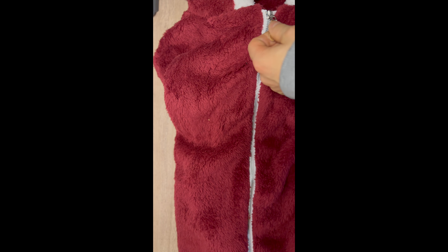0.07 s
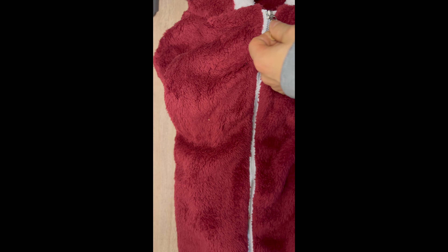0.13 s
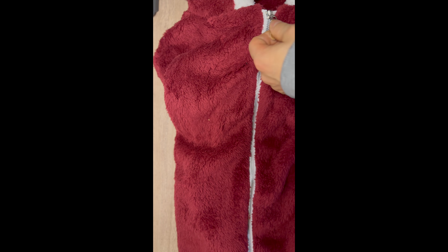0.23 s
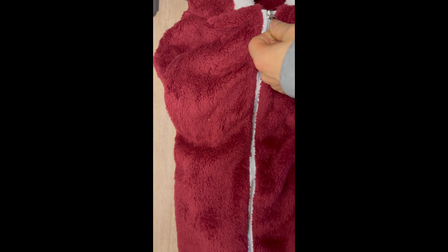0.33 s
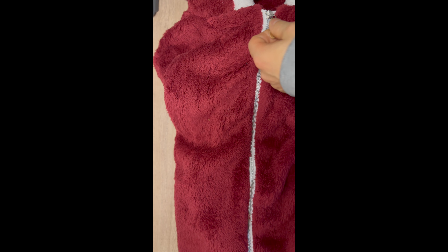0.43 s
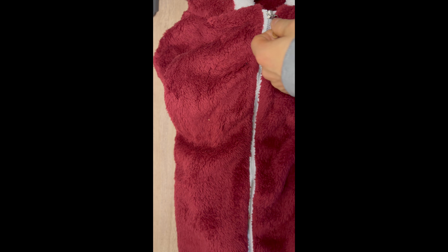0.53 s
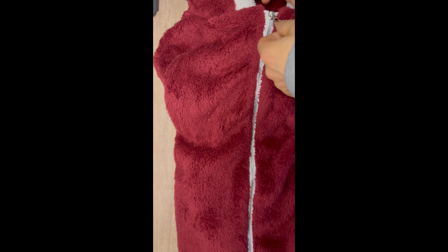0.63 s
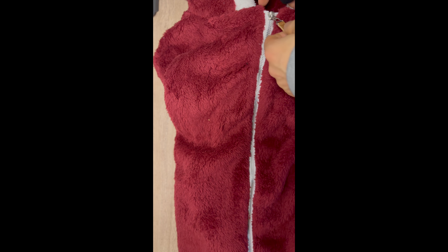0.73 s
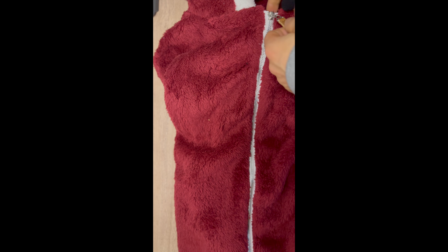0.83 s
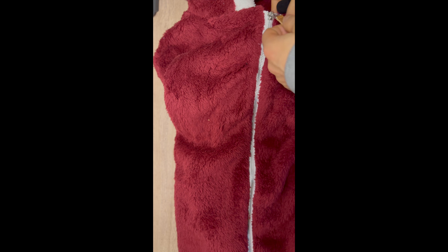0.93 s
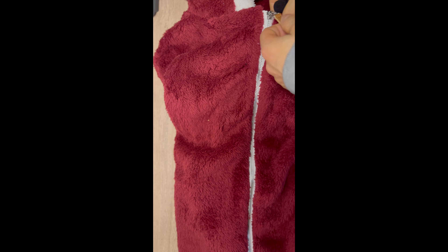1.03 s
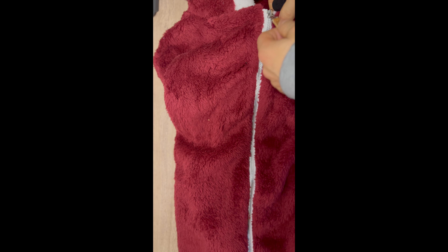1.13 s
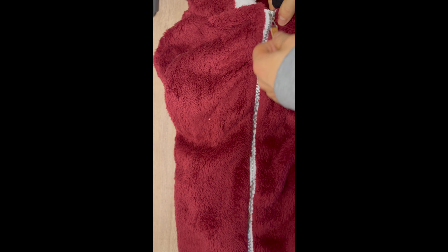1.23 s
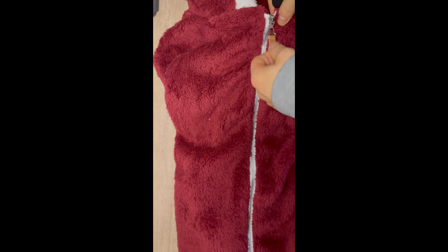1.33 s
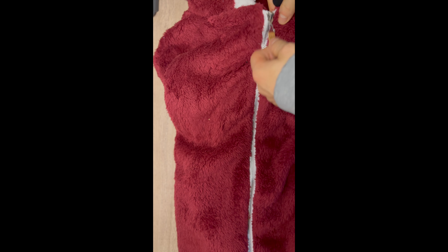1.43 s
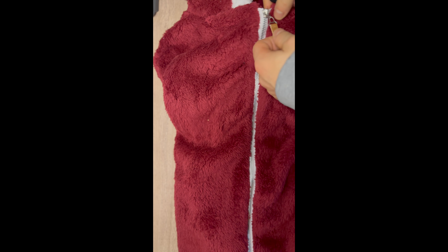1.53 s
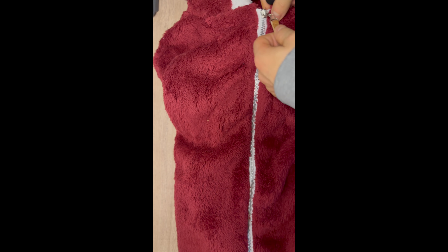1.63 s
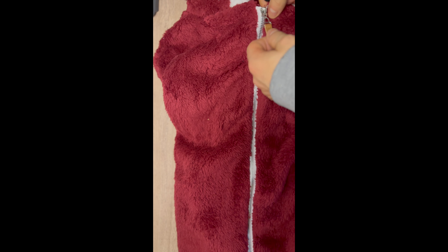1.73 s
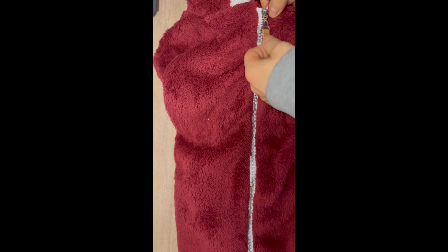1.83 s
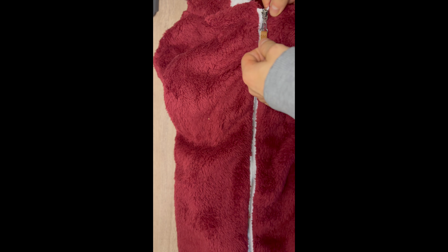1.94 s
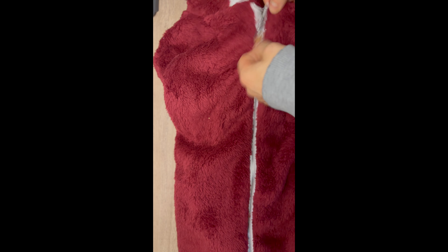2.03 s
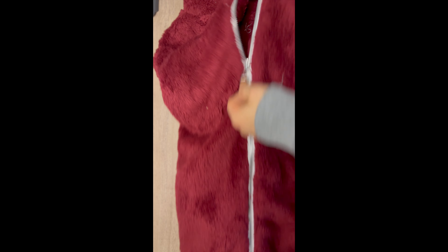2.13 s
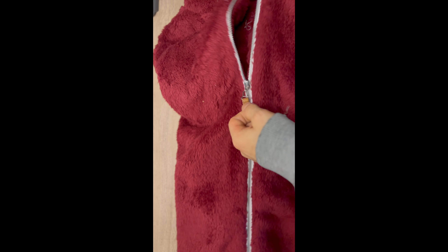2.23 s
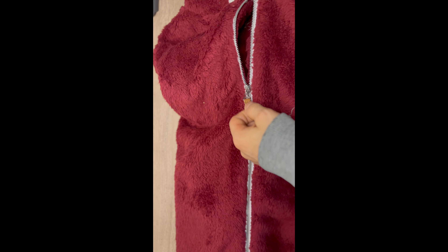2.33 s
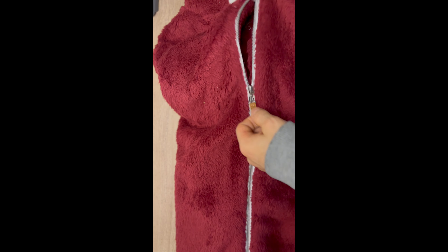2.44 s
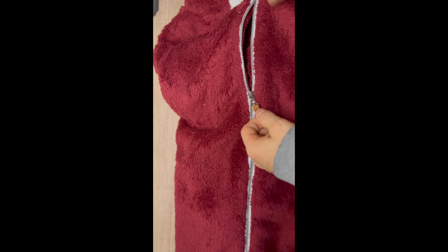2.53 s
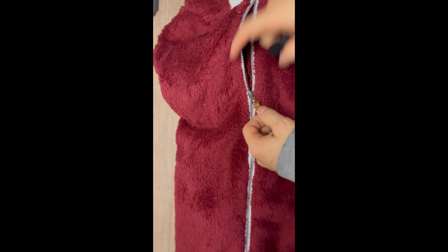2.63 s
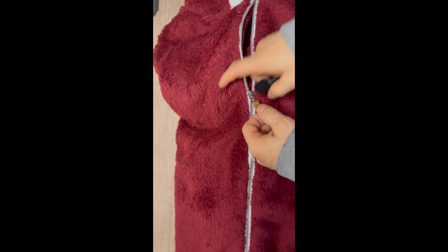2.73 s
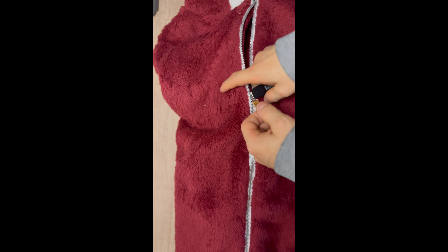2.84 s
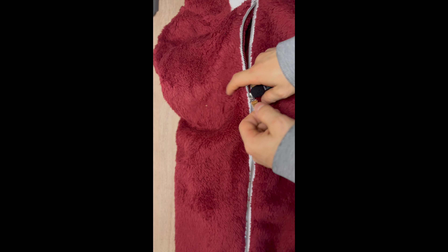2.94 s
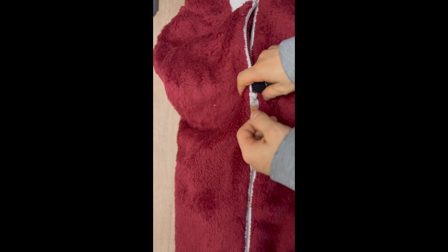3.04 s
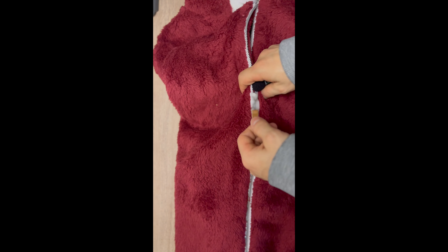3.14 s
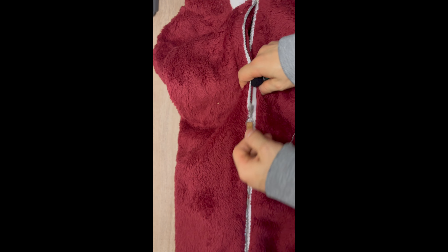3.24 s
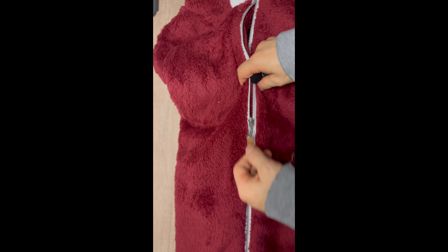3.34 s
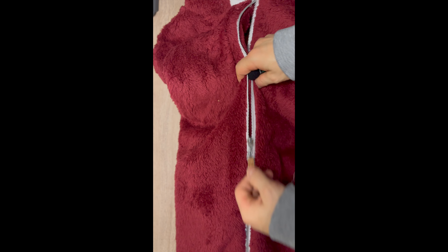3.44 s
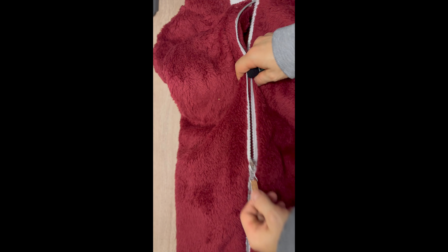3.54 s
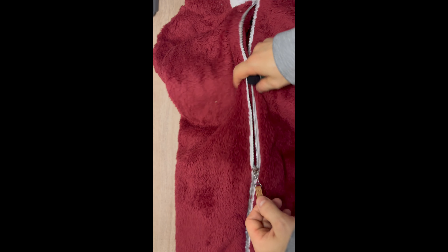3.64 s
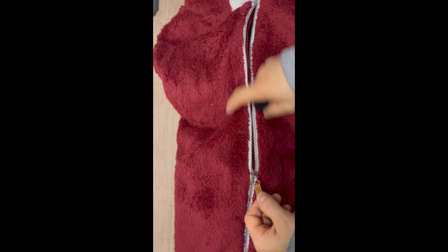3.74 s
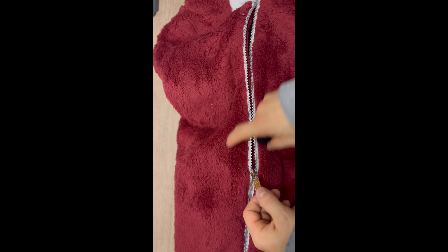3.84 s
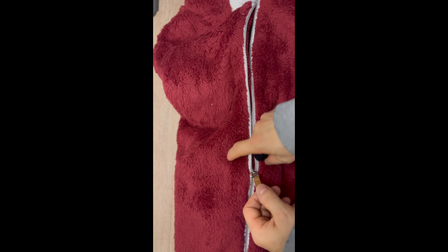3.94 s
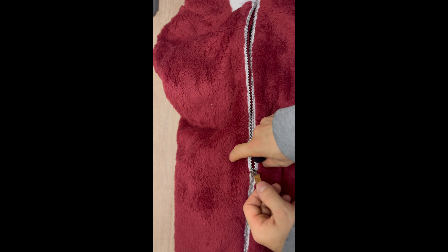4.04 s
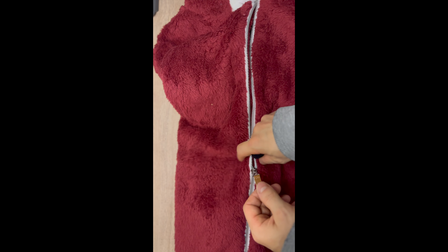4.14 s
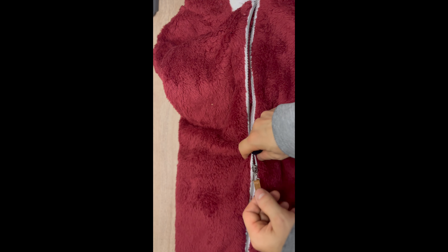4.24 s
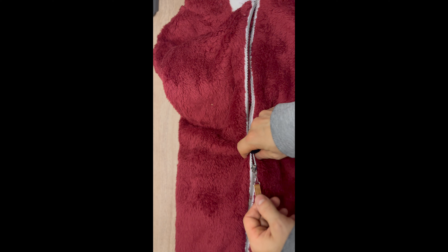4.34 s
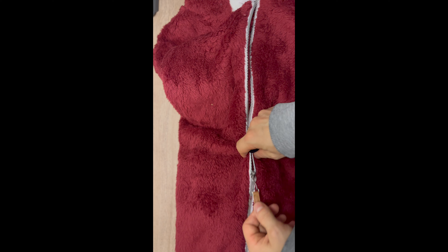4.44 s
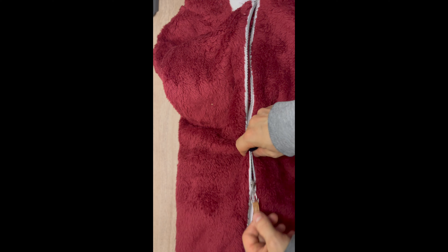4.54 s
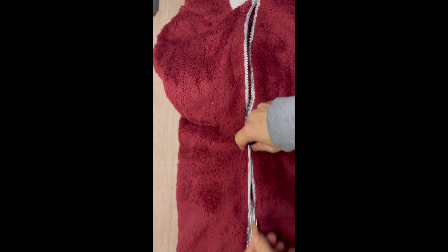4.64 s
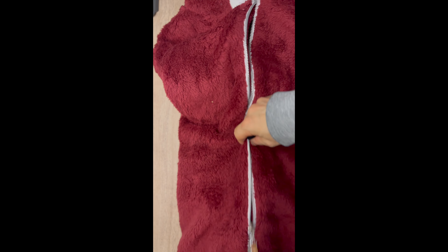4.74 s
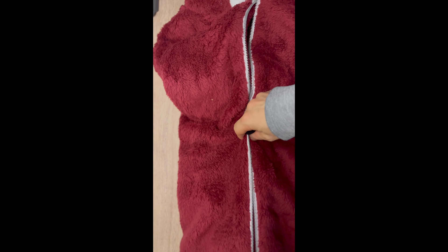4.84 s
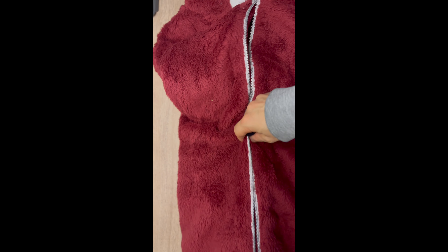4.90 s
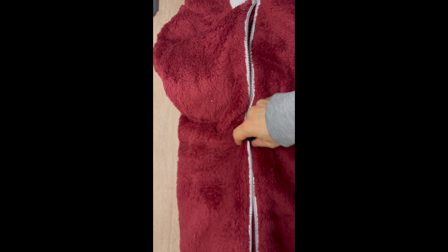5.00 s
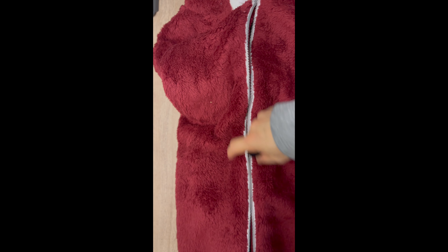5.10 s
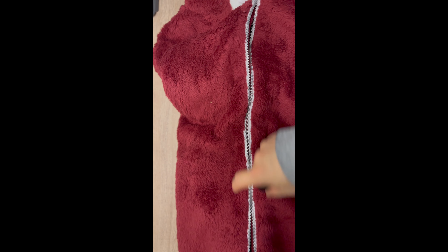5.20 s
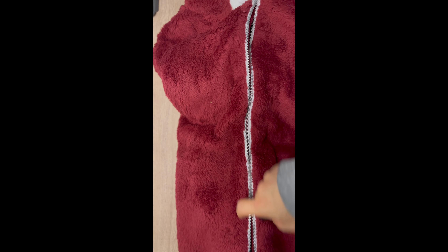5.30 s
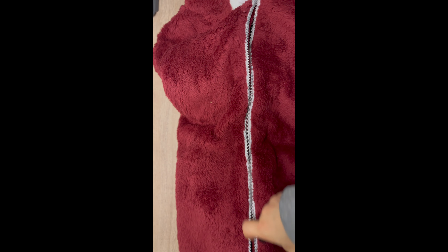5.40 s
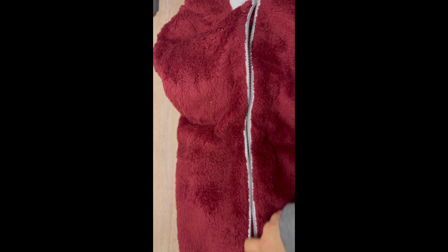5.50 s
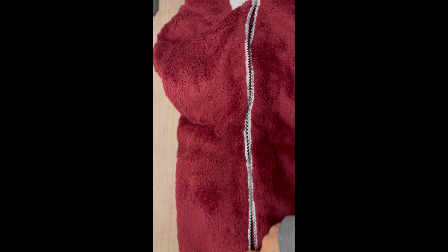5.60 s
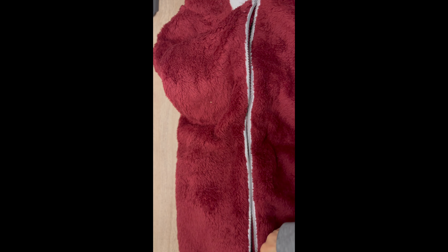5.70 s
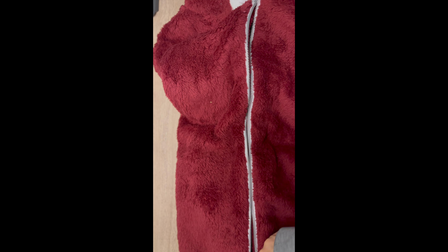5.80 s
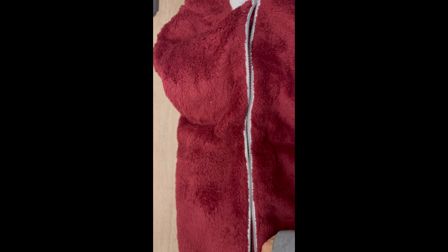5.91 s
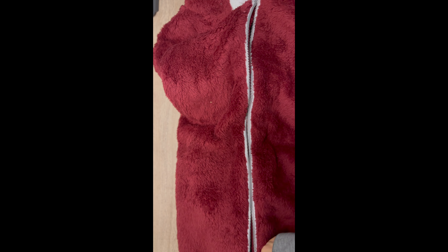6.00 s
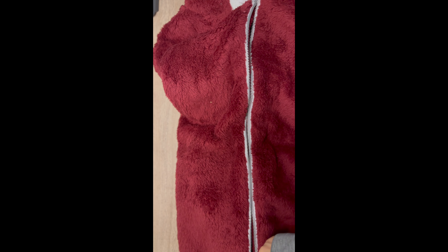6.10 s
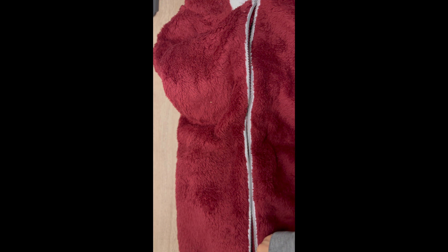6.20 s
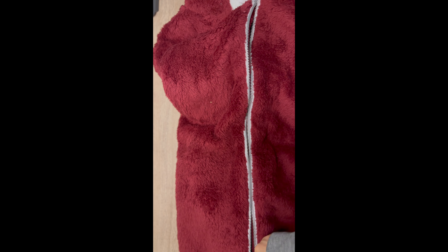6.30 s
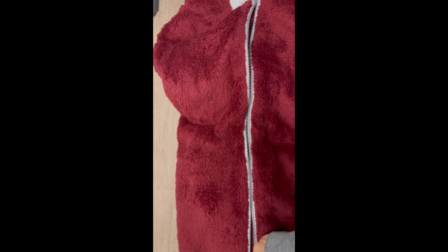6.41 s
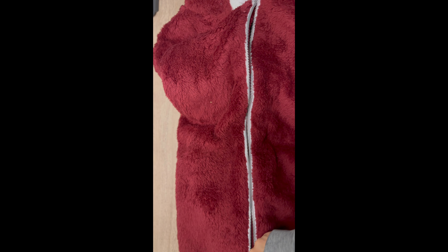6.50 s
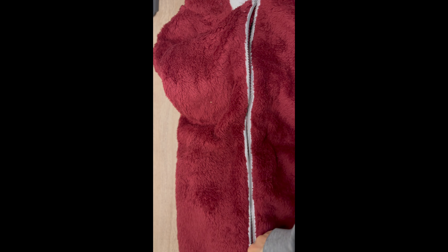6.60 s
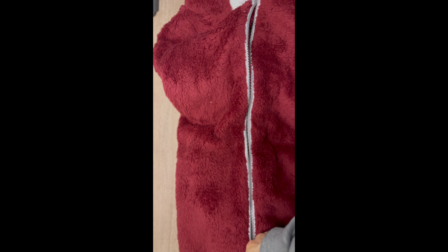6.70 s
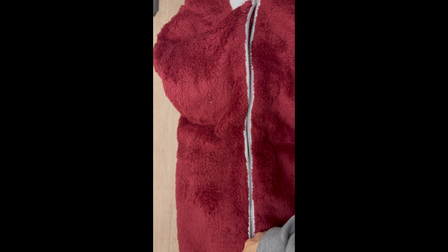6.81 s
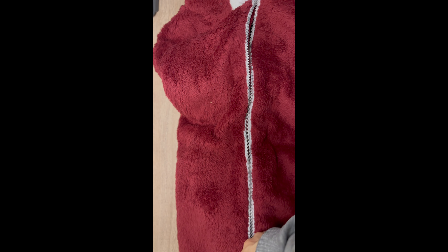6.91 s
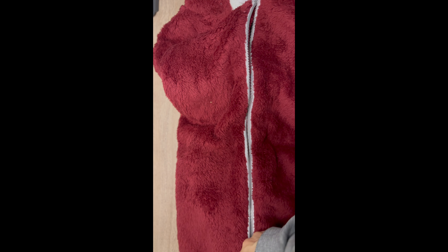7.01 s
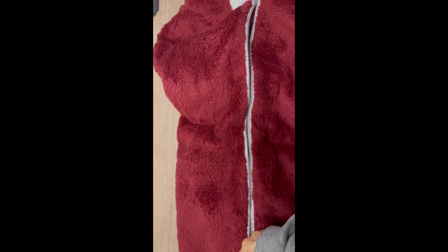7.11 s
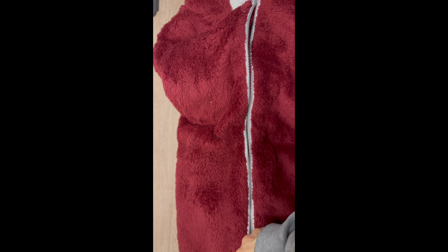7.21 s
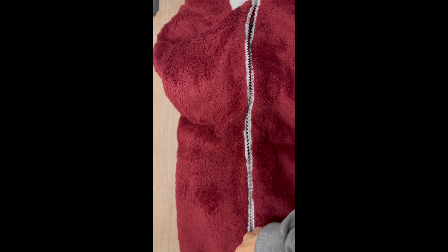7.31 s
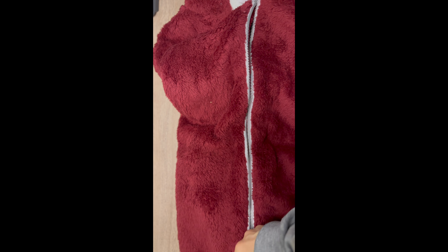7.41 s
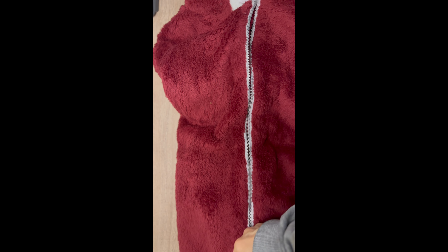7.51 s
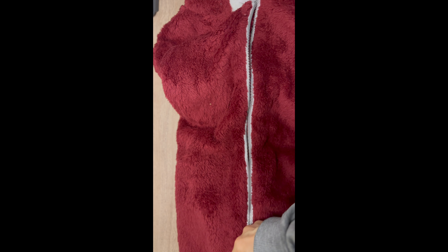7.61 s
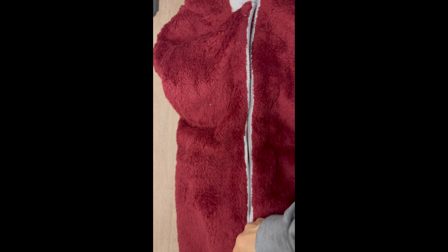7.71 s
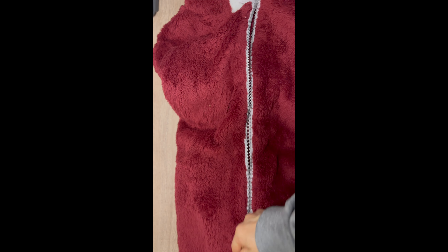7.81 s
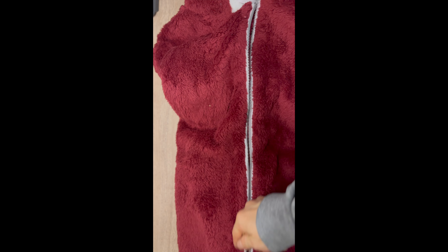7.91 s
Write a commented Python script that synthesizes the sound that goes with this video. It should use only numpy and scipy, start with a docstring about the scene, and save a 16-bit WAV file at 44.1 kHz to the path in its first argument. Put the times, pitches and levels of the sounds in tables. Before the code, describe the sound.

Very close up, fleece scuffs against the microphone while fingers fumble with a metal zipper. The slider ticks and snags, gives one quick zip, then two slightly longer buzzing runs with knocks and clicks between them. The soft cloth swishes and crunches again before a last, weaker pull. The hand-held microphone picks up rumble and muffled thumps, and the room behind is nearly silent.

```python
"""A very quiet room, a hand-held microphone right next to the metal zipper of a fleece jacket.
Fleece rustles under the hands and sticks and slips on the microphone's shell; the grip rumbles and
fingers bump. The zipper is worked open in four short pulls: the slider catches on single teeth,
then runs and buzzes at the tooth rate. This close, the loudest moments overload the input."""
import sys
import numpy as np
from scipy import signal
from scipy.fft import rfft, irfft, next_fast_len
from scipy.io import wavfile
from scipy.ndimage import uniform_filter1d, map_coordinates

SR = 44100
rng = np.random.default_rng(int(sys.argv[2]) if len(sys.argv) > 2 else 0)


def generate_wav(sig):
    """Save sig (samples, or channels by samples) to the path in sys.argv[1] as 16-bit PCM at SR."""
    pcm = np.round(np.clip(np.atleast_2d(sig).T, -1, 1) * 32767).astype(np.int16)
    wavfile.write(sys.argv[1], SR, pcm)


N = 350683
TIME = np.arange(N) / SR
LEAD = SR // 40  # samples ahead of a contact
AROUND = np.arange(-LEAD, 3 * LEAD) / SR  # time around one contact [s]
BEFORE, AFTER = np.minimum(AROUND, 0), np.maximum(AROUND, 0)


def amp(db):
    return 10 ** (np.asarray(db) / 20)


def unit(x):
    return x / np.sqrt(np.mean(x ** 2) + 1e-20)


def curves(rows, t=TIME):
    """Each column after the time, interpolated at t."""
    times, *columns = np.transpose(rows)
    return [np.interp(t, times, column) for column in columns]


def wobble(rate, n=N):
    """A smooth random curve, rate knots a second."""
    return map_coordinates(rng.standard_normal(int(n * rate / SR) + 4), [np.arange(n) * rate / SR])


def colour(x, points):
    """Causal filter with the gain of (Hz, dB) points, falling steeply above the last one."""
    m = 2 * next_fast_len(len(x) // 2 + 2048)
    hz, db = np.transpose(points)
    grid = np.fft.rfftfreq(m, 1 / SR) + 1
    gain = amp(np.interp(np.log(grid), np.log(hz), db)) / np.maximum(grid / hz[-1], 1) ** 3
    cepstrum = irfft(np.log(gain))
    cepstrum[1:m // 2] *= 2  # folded for minimum phase
    cepstrum[m // 2 + 1:] = 0
    return irfft(rfft(x, m) * np.exp(rfft(cepstrum)), m)[:len(x)]


def noise(points, envelope):
    """White noise under an envelope, coloured, rms 1."""
    return unit(colour(envelope * rng.standard_normal(len(envelope)), points))


def burst(x, seconds):
    """Scale x to the energy of a signal of rms 1 that lasts so long."""
    return x * np.sqrt(seconds * SR / (np.sum(x ** 2) + 1e-20))


def add(track, s, x):
    """Mix x into the track from time s on."""
    i = max(round(s * SR), 0)
    track[i:i + len(x)] += x[:max(N - i, 0)]


def swell(start, top, end, fade_db=21.5, reach=2.1):
    """A hand movement, 0-1: fade_db down at start and end, cut off at reach times its length."""
    out = np.zeros(N)
    limits = top + reach * (np.array([start, end]) - top)
    first, last = np.clip(np.round(SR * limits), 0, N).astype(int)
    t = TIME[first:last]
    away = np.abs(t - top) / np.maximum(np.where(t < top, top - start, end - top), 1 / SR)
    out[first:last] = amp(-fade_db * away ** np.where(t < top, 1.9, 1.7))
    return out


def scattered(runs, jitter=.25, spread_db=2.5):
    """Small contacts through each run, uneven in spacing and strength: (time [s], three levels [dB])."""
    rows = []
    for (start, end, rate, *levels), chance in zip(runs, rng.standard_normal((len(runs), 64, 5))):
        for k, (late, strength, *tone) in enumerate(chance[:round((end - start) * rate)]):
            varied_db = np.add(levels, spread_db * (strength + np.array(tone)))
            rows.append((start + (k + .5 + jitter * late) / rate, *varied_db))
    return rows


# Room tone at the microphone: (frequency [Hz], level [dB])
ROOM_SPECTRUM = [(20, 8), (60, 1), (200, -14), (1000, -33), (8000, -46), (16000, -53)]


def room_tone():
    """The room behind everything: faint, steady, mostly bass."""
    return amp(-66) * noise(ROOM_SPECTRUM, np.ones(N))


# A hand strokes the fleece beside the microphone:
# (start [s], fastest [s], end [s], rub [dB], hiss [dB], hollow under the hand [Hz], its share [0-1])
STROKES = [(-.05, 0.01, .12, -37.5, -35.5, 850, 0.23), (0.109, 0.135, 0.18, -37, -42.5, 912, 0.84),
           (.205, .23, 0.24, -47, -45.5, 843, 0.5), (.325, 0.376, .48, -28, -27, 1298, .1),
           (.45, 0.502, 0.59, -40.5, -42, 1350, 0.6), (0.599, 0.624, 0.66, -40, -38.5, 1302, .3),
           (0.636, 0.678, .78, -52.5, -50, 1299, 0.25), (0.801, 0.928, 0.96, -35.5, -35, 1249, 0.6),
           (.95, 1.02, 1.128, -32, -35.5, 1550, 0.84), (1.05, 1.135, 1.247, -35.5, -39.5, 1752, 0.6),
           (1.16, 1.459, 1.57, -43.5, -43.5, 2030, 0.13), (1.491, 1.643, 1.703, -33, -36, 1990, 0),
           (1.683, 1.792, 1.86, -39.5, -43.5, 2000, 0.16), (1.866, 1.91, 2.01, -53, -56, 2000, 0.2),
           (2.26, 2.342, 2.43, -44, -52.5, 2870, .65), (2.47, 2.503, 2.57, -32, -35.5, 1700, 0.54),
           (2.601, 2.636, 2.77, -36.5, -43.5, 1650, 0.94), (2.749, 2.795, 2.9, -49.5, -56, 1600, 0.86),
           (2.845, 2.885, 3.04, -35, -34, 1494, .1), (2.967, 3.158, 3.176, -29, -37.5, 1490, 0.08),
           (3.183, 3.239, 3.46, -35.5, -38.5, 1500, 0), (3.68, 3.742, 3.79, -27, -32, 1499, 0.11),
           (3.84, 3.89, 3.92, -45, -64, 1403, 0), (3.975, 4.015, 4.08, -52, -62, 1314, 0.53),
           (4.11, 4.25, 4.36, -51, -54, 1398, 0.14), (4.355, 4.419, 4.46, -40, -57, 1490, 0.2),
           (4.975, 5.013, 5.08, -36, -42.5, 1896, 0.44), (5.031, 5.105, 5.175, -40, -48, 1900, 0),
           (5.16, 5.23, 5.36, -49, -55, 1820, 0.63), (5.346, 5.385, 5.41, -48, -35, 1800, .1),
           (5.41, 5.455, 5.545, -35, -33, 1820, 0.14), (5.608, 5.628, 5.66, -39, -37, 1794, 0.04),
           (5.92, 5.953, 6.0, -28, -31, 1794, .1), (5.977, 6.138, 6.35, -30, -37, 1790, 0.04),
           (6.194, 6.388, 6.5, -39, -40, 1790, 0), (6.484, 6.563, 6.68, -38.5, -34.5, 1700, 0.11),
           (6.648, 6.669, 6.7, -57, -49, 1708, 0.03), (6.768, 6.815, 6.87, -58, -55.5, 1705, 0.32),
           (6.848, 6.879, 7.13, -44, -51, 1750, .5), (6.995, 7.092, 7.12, -24, -23.5, 1840, .05),
           (7.458, 7.49, 7.546, -53, -47.5, 1800, .1), (7.56, 7.585, 7.68, -35, -36, 1800, 0.02)]


def strokes():
    """Strokes add in power as rub and hiss; the hardest rub dominates the hollow's pitch and share."""
    rub, hiss, hollow_hz, share = np.zeros((4, N))
    for start, top, end, rub_db, hiss_db, hz, part in STROKES:
        speed = swell(start, top, end)
        power = (amp(rub_db) * speed) ** 2
        rub += power
        hiss += (amp(hiss_db) * speed) ** 2
        hollow_hz += hz * power
        share += part * power
    return np.sqrt(rub), np.sqrt(hiss), hollow_hz / (rub + 1e-20), np.clip(share / (rub + 1e-20), 0, 1)


# Unrest of the hand that holds the microphone: (time [s], level [dB])
GRIP = [(0, -40), (.19, -56), (.27, -52), (.3, -36), (.6, -34), (1.0, -37), (1.24, -48), (1.35, -31),
        (1.68, -43), (2.0, -48), (2.45, -50), (3.9, -53.5), (5.3, -51), (5.58, -61), (5.8, -63),
        (6.3, -49.5), (6.75, -54), (7.1, -48), (7.42, -56), (7.7, -50)]
# The hand leans on the microphone: (start [s], hardest [s], end [s], rumble [dB], cloth drag [dB])
PRESSES = [(.98, 1.128, 1.26, -27, -34), (2.037, 2.123, 2.58, -38, -42), (2.095, 2.117, 2.16, -14, -24),
           (2.87, 2.92, 2.995, -21, -30), (2.966, 3.13, 3.17, -38, -29), (3.2, 3.269, 3.7, -22, -28.5),
           (3.67, 3.728, 3.82, -36.5, -31), (3.977, 4.018, 4.1, -30.5, -32.5),
           (4.044, 4.088, 4.4, -25.5, -32.5), (4.198, 4.449, 5.34, -32, -29.5),
           (5.067, 5.103, 5.15, -50, -29.5), (5.41, 5.509, 5.51, -28, -30), (5.603, 5.624, 5.6, -40, -32),
           (5.66, 5.79, 5.83, -45, -60), (5.8, 5.825, 6.0, -24, -45), (6.011, 6.123, 6.28, -29, -26),
           (7.717, 7.75, 8.5, -17.5, -23)]
# Handling noise through the shell, deepest first: (frequency [Hz], level [dB])
RUMBLE_SPECTRUM = [(10, -8.5), (25, -5), (55, 5.5), (100, -6.5), (160, -18.5), (400, -60)]
DRAG_SPECTRUM = [(60, -19.5), (125, -4.5), (185, -3), (270, -8.5), (500, -31), (1000, -52.5)]
SCRUB_SPECTRUM = [(120, -27), (230, 2.5), (380, -1.5), (540, -9.5), (1000, -35)]


def handling(rub_level, brightening=1.228):
    """Grip, strokes and presses reach the microphone as rumble and lumpy drag, brighter when harder."""
    grip = amp(curves(GRIP)[0])
    shake = np.hypot(grip, amp(-11.5) * rub_level)
    friction = np.hypot(amp(-12.5) * grip, amp(-5.5) * rub_level)
    for start, top, end, rumble_db, drag_db in PRESSES:
        weight = swell(start, top, end)
        shake = np.maximum(shake, amp(rumble_db) * weight)
        friction = np.maximum(friction, amp(drag_db) * weight)
    lumps = amp(4.5 * wobble(120))
    rumble = shake * noise(RUMBLE_SPECTRUM, amp(2.2 * wobble(21)))
    drag = friction * noise(DRAG_SPECTRUM, lumps)
    scrub = friction ** brightening * noise(SCRUB_SPECTRUM, lumps)
    return amp(-.5) * (rumble + drag) + amp(3) * scrub


def hollow_resonance(hz, width_hz):
    """The hollow under a cupped hand rings: narrow noise of rms 1 whose centre follows hz."""
    pole = np.exp(-np.pi * width_hz / SR)
    band = rng.standard_normal(N) + 1j * rng.standard_normal(N)
    for _ in range(2):
        band = signal.lfilter([1], [1, -pole], band)
    return unit(np.real(band * np.exp(2j * np.pi * np.cumsum(hz) / SR)))


# Skin on fleece, heard close up: (frequency [Hz], level [dB])
RUB_SPECTRUM = [(250, -22.5), (500, -1.5), (850, -0.5), (1300, -3), (1800, -1.5), (2300, -3.5), (3200, -9),
                (6000, -50.5)]
HISS_SPECTRUM = [(1410, -33.5), (2400, -7), (2660, -12), (3460, -3), (3740, -5), (4860, -5.5),
                 (5270, -13.5), (6470, -7.5), (7470, -3), (8550, -18.5), (9400, -8), (10300, -21),
                 (12200, -22.5), (15100, -36), (16000, -44)]
RASP_SPECTRUM = [(1500, -18.5), (2600, 1), (3400, 2), (4600, -4), (7000, -16)]


def fleece(rub_level, hiss_level, hollow_hz, share, grain_db=3.5, clump_db=3.5):
    """Fibres flick past the skin in clumps; the cupped hand rings with them and is never quite still."""
    grip_db = np.minimum(curves(GRIP)[0], -47.5)  # a firmer grip rustles no louder
    grains = amp(grain_db * wobble(900) + clump_db * wobble(90))
    flat_hand = noise(RUB_SPECTRUM, grains * amp(1.2 * wobble(180)))
    hollow_hz = hollow_hz * (1 + .04 * wobble(14))
    ringing = hollow_resonance(hollow_hz, width_hz=520)
    ringing += amp(-13) * hollow_resonance(1.95 * hollow_hz, width_hz=600)
    cupped_hand = unit(np.sqrt(grains) * ringing)
    rub = np.sqrt(1 - share) * flat_hand + np.sqrt(share) * cupped_hand
    rub *= np.hypot(rub_level, amp(grip_db - 17))
    hiss = np.hypot(hiss_level, amp(grip_db - 22)) * noise(HISS_SPECTRUM, grains ** .83)
    rasp = rub_level ** 1.59 * noise(RASP_SPECTRUM, grains)  # stands out in fast strokes
    return (amp(-.5) * (rub + hiss) + amp(7) * rasp) * amp(wobble(35))


# Cloth snaps free, right on the microphone: (time [s], push [dB], crunch [dB], fizz [dB])
SLIPS = [(.302, -6, -12, -11), (.329, -1.5, -11, -8.5), (.36, -8, -8.5, -6), (0.3805, -10.5, -13.5, -18.5),
         (.393, -5.5, -15.5, -11), (.423, -14.5, -16, -14.5), (.924, -22, -26.5, -30),
         (5.43, -23.5, -19, -19.5), (5.447, -16, -17.5, -15.5), (5.461, -19.5, -17, -20.5),
         (5.475, -19, -20.5, -19.5), (5.481, -17, -27, -19), (5.533, -28, -26.5, -32),
         (5.807, -23, -19, -17.5), (5.821, -15.5, -28, -32.5), (5.831, -11.5, -16, -25.5),
         (5.843, -25.5, -27, -41), (5.8755, -11, -10.5, -14.5), (5.884, -11, -15.5, -18),
         (5.9158, -18, -15.5, -35), (5.942, -17, -12.5, -22), (5.9519, -29, -19.5, -21),
         (5.9703, -23, -16.5, -35), (6.036, -43, -23.5, -35), (6.326, -41, -23.5, -36),
         (7.568, -50, -42, -31.5), (7.62, -26.5, -26, -30.5)]
# Runs of smaller slips: (start [s], end [s], rate [1/s], push [dB], crunch [dB], fizz [dB])
STUTTERS = [(.362, .45, 70, -19, -23.5, -21.5), (5.885, 6.0, 52, -26, -25.5, -37.5),
            (6.35, 6.42, 43, -42, -30, -38), (7.59, 7.64, 40, -31, -29.5, -33.5)]
# Fibres letting go of the shell: (frequency [Hz], level [dB])
CRUNCH_SPECTRUM = [(120, -19.5), (300, 9), (700, -1), (1200, -11.5), (2100, -8), (3000, -17.5), (6000, -36)]
FIZZ_SPECTRUM = [(1400, -25), (2500, 0.5), (3800, 0), (5200, 2), (6200, -0.5), (7500, -1.5), (9000, -5),
                 (11000, -9), (15500, -26.5)]


def slips():
    """Cloth drags the shell along with growing hiss, lets go, and the shell springs back."""
    out = np.zeros(N)
    stuck = AROUND < 0
    rebound = -np.exp(-AFTER / .0036) * np.cos(2 * np.pi * 42 * AFTER)
    shell = np.where(stuck, np.exp(BEFORE / .0028), rebound)
    push = colour(shell, [(250, -4.5), (600, -17), (3000, -4.5), (16000, -46.5)])
    release = np.exp(-AFTER / .0016) + .28 * np.exp(-AFTER / .0057)
    fibres = np.where(stuck, .6 * np.exp(BEFORE / .0015), release)
    for s, push_db, crunch_db, fizz_db in SLIPS + scattered(STUTTERS):
        sound = amp(push_db) * burst(push, .011)
        sound += amp(crunch_db) * burst(noise(CRUNCH_SPECTRUM, fibres), .0047)
        sound += amp(fizz_db) * burst(noise(FIZZ_SPECTRUM, fibres), .0049)
        add(out, s - LEAD / SR, rng.choice([-1, 1]) * sound)
    return out


# Dull low thumps, close up: soft finger bumps, and two strong zipper tugs as the third pull starts:
# (time [s], level [dB])
THUMPS = [(1.305, -22.5), (1.324, -22.5), (1.401, -20), (1.42, -18.5), (3.069, -20.5), (3.113, -16.5),
          (3.135, -15.5), (3.202, -20), (4.381, -24), (4.394, -19), (4.548, -6), (4.612, -4), (6.116, -16),
          (6.188, -18.5)]


def thumps():
    """A finger bump or a tug on the zipper gives one dull, heavily damped swing and a small scuff."""
    out = np.zeros(N)
    for s, db in THUMPS:
        hz = 170 * np.exp(.18 * rng.standard_normal())
        swing = np.sin(2 * np.pi * hz * AFTER) * np.exp(-AFTER / .0017)
        scuff = noise(CRUNCH_SPECTRUM, (AROUND >= 0) * np.exp(-AFTER / .0013))
        add(out, s - LEAD / SR - .001, -amp(db) * burst(unit(swing) + .2 * scuff, .0098))
    return out


# Slider or tab catches on a tooth, close up: (time [s], thud [dB], knock [dB], click [dB])
CATCHES = [(1.461, -42, -22, -29), (1.499, -17, -20, -27.5), (1.505, -31, -23, -31.5),
           (1.793, -11.5, -12.5, -26), (1.797, -35, -18.5, -24.5), (1.888, -19.5, -19.5, -35.5),
           (1.9272, -24, -25, -40), (1.935, -36, -11.5, -30.5), (1.987, -21, -19.5, -35.5),
           (1.999, -36, -24.5, -32.5), (2.06, -27, -25, -42), (2.1051, -7, -10.5, -25.5),
           (2.11, -1.5, -1, -13), (2.113, -1, -13.5, -19), (2.122, -4, -8, -6.5),
           (2.1408, -18.5, -9, -19.5), (2.374, -48, -31.5, -39), (2.679, -18, -14, -20.5),
           (2.734, -50, -45, -37), (2.8613, -32, -26, -30), (2.8676, -18, -27, -28),
           (2.884, -22, -11.5, -19), (2.904, -20, -30.5, -26.5), (3.025, -29, -21.5, -30.5),
           (3.208, -16, -23, -26.5), (3.2164, -27.5, -24.5, -26), (3.252, -8, 0, -21),
           (3.63, -15.5, -17, -22.5), (3.835, -32, -40.5, -55), (3.871, -27, -27, -46),
           (4.0755, -27.5, -39, -49), (4.1, -18, -27, -42), (4.111, -18, -28.5, -38.5),
           (4.1177, -17, -18.5, -33.5), (4.151, -30, -28, -40), (4.287, -11.5, -20, -34),
           (4.325, -18, -28, -34), (4.362, -38, -27, -46), (4.451, -5.5, -8, -28),
           (4.457, -11, -24.5, -29.5), (4.4684, -17.5, -19.5, -21), (4.481, -3.5, 0, -16),
           (4.5, -12, -7, -23.5), (4.5046, -10.5, -3, -21.5), (4.513, -7, -11, -21.5),
           (4.5209, -5.5, -6.5, -20), (4.5353, -10.5, -5, -25.5), (4.5565, -1, -2, -19),
           (4.573, -9, -4.5, -22), (4.587, -2, -5.5, -23), (4.603, -5, -5.5, -20),
           (4.6244, -8, -4.5, -21.5), (4.647, -11, -8.5, -23), (4.6658, -18, -2, -23),
           (4.953, -23.5, -36.5, -36), (4.986, -50, -33, -31), (4.998, -49, -32, -25.5),
           (5.1, -28, -28, -37.5), (5.1894, -34, -33, -44), (5.2084, -28, -25, -29.5),
           (5.735, -41.5, -42.5, -54), (6.894, -37, -30, -35), (7.4744, -28, -29.5, -39.5)]
# Creeping from tooth to tooth: (start [s], end [s], rate [1/s], thud [dB], knock [dB], click [dB])
CREEPS = [(2.31, 2.36, 40, -48, -40.5, -47), (3.0, 3.07, 30, -34, -26.5, -43.5),
          (3.875, 3.925, 40, -34, -39, -49), (4.195, 4.32, 48, -24, -31, -37),
          (4.565, 4.66, 60, -9, -13, -24), (5.22, 5.31, 40, -46, -50, -56),
          (7.147, 7.21, 47, -45, -45, -54), (7.205, 7.44, 13, -47, -52, -59)]
# Taut cloth thuds higher than slack cloth: (time [s], frequency [Hz])
THUD_PITCH = [(2.0, 179), (2.07, 85), (2.7, 130.5), (4.1, 80.2), (4.5, 100), (4.6, 140.6), (7.5, 170)]
# Modes of the metal slider: (frequency [Hz], time to fall 60 dB [s], level [dB])
SLIDER_MODES = [(506, 0.011, 2.5), (830, 0.0076, -1), (1150, 0.021, -6.5), (1932, 0.014, -4),
                (2380, 0.0062, -12.5)]
# Cloth thud and metal click at the microphone: (frequency [Hz], level [dB])
THUD_SPECTRUM = [(15, -22.5), (40, -1.5), (80, -4.5), (300, 5), (1000, -15.5), (4000, -38)]
CLICK_SPECTRUM = [(1500, -38), (2600, 4.5), (3400, 10), (4900, 6.5), (5800, -1), (7400, 5), (9000, -4.5),
                  (12000, -12.5), (16000, -28.5)]


def catches(thud_decay_cycles=.33):
    """The slider scrapes onto a tooth and jumps it: a click, a short ring, a thud through the cloth."""
    out = np.zeros(N)
    struck = AROUND >= 0
    click_decay = np.exp(-AFTER / .0022) + .21 * np.exp(-AFTER / .012)
    click_envelope = np.where(struck, click_decay, .17 * np.exp(BEFORE / .0025))
    for s, thud_db, knock_db, click_db in CATCHES + scattered(CREEPS):
        cycles = curves(THUD_PITCH, s)[0] * np.exp(.2 * rng.standard_normal()) * AFTER
        thud = colour(np.sin(2 * np.pi * cycles) * np.exp(-cycles / thud_decay_cycles), THUD_SPECTRUM)
        ring = 0
        for hz, t60, db in SLIDER_MODES:  # the grip damps and detunes them differently each time
            decay = amp(db + 1.4 * rng.standard_normal() - 60 * AFTER / t60)
            ring += decay * np.sin(2 * np.pi * hz * np.exp(.1 * rng.standard_normal()) * AFTER)
        grit = noise(CRUNCH_SPECTRUM, struck * np.exp(-AFTER / .0014))
        sound = amp(thud_db) * burst(thud, .0055)
        sound += amp(knock_db) * burst(unit(ring) + .99 * grit, .0045)
        sound += amp(click_db) * burst(noise(CLICK_SPECTRUM, click_envelope), .0032)
        add(out, s - LEAD / SR, rng.choice([-1, 1]) * sound)
    return out


def tooth_impacts(rate, passed, even, jitter=.16, spread_db=5.5):
    """The two rows of teeth enter the slider in turn, early or late when the tape is slack."""
    teeth = np.zeros(len(rate))
    at = np.flatnonzero(np.diff(np.floor(passed)))
    chance = rng.standard_normal((len(at), 4))
    for row in range(2):
        late = (row / 2 + jitter * (1 - even[at]) * chance[:, row]) * SR / rate[at]
        size = amp(spread_db * np.tanh(chance[:, row + 2]) - 3.5 * row) / np.sqrt(rate[at])
        np.add.at(teeth, np.clip(at + late.astype(int), 0, len(teeth) - 1), size)
    return teeth


# Harmonics of the running zipper: (multiple of the tooth rate, level [dB])
BUZZ_HARMONICS = [(1, -4), (2, -5), (3, -7), (4, -10.5), (5, -18)]


def tape_buzz(rate, passed, even, corner_hz):
    """Each tooth tugs a little differently; the soft tape passes the overtones below its corner."""
    n = len(rate)
    buzz = 0
    for k, db in BUZZ_HARMONICS:
        level = amp(db + .88 * wobble(90, n)) / np.sqrt(1 + (k * rate / corner_hz) ** 8)
        phase = 2 * np.pi * (k * passed + rng.random()) + .063 * k * wobble(250, n)
        buzz += level * np.sin(phase)
    flutter_db = (1.5 + 5 * (1 - even)) * wobble(330, n)
    return unit(buzz * amp(flutter_db))


def disperse(x, delay):
    """Bending waves in cloth: low notes arrive late, by the given seconds at 200 Hz."""
    m = next_fast_len(len(x) + 4096)
    phase = 4 * np.pi * delay * np.sqrt(200 * np.fft.rfftfreq(m, 1 / SR))
    return irfft(rfft(x, m) * np.exp(-1j * phase), m)[:len(x)]


# The slider snags in mid-run and the teeth fall quiet: (time [s], half length [s], dip [dB])
SNAGS = [(3.361, 0.003, 15.5), (3.397, 0.0057, 19), (3.496, 0.02, 4.5)]
# Tape, teeth, sliding metal and a fast slider's treble, close up: (frequency [Hz], level [dB])
TAPE_SPECTRUM = [(30, -21), (80, -0.5), (160, 3.5), (300, 1.5), (500, -4), (700, -3.5), (950, -9.5),
                 (1200, -10.5), (1700, -28.5), (4000, -65)]
RATTLE_SPECTRUM = [(500, -45.5), (900, -4), (1250, -1), (1900, 0), (2700, -6), (3900, -8.5), (4800, -24),
                   (8000, -43.5)]
SCRAPE_SPECTRUM = [(2500, -34), (4200, -1), (5200, 3), (6800, 5.5), (8500, -7.5), (10000, -10.5),
                   (12000, -17), (15800, -16.5)]
SHEEN_SPECTRUM = [(5000, -25), (8500, -3), (10500, -0.5), (13000, -3), (15800, -5.5)]


def pull(speed, levels, evenness, corner_hz, contact_s=.0016, sheen_teeth_per_s=590):
    """One run of the slider: each tooth tugs the tape, rattles and scrapes."""
    t = np.arange(levels[0][0], levels[-1][0], 1 / SR)
    n = len(t)
    tug_db, rattle_db, scrape_db = curves(levels, t)
    snag_db = sum(db * np.exp(-((t - s) / half) ** 2) for s, half, db in SNAGS)
    even = evenness * np.interp(np.arange(n) / n, [0, .35], [.45, 1])  # runs freely a third of the way in
    # the hand's speed wavers, most when the teeth pass unevenly
    rate = curves(speed, t)[0] * (1 + .08 * (1.1 - even) * wobble(110, n))
    rate *= 1 + .02 * wobble(170, n)
    passed = np.cumsum(rate) / SR  # teeth so far
    teeth = tooth_impacts(rate, passed, even)
    rubbing = unit(signal.lfilter([1], [1, -np.exp(-1 / (contact_s * SR))], teeth)) + .25
    buzz = tape_buzz(rate, passed, even, corner_hz)
    jolts = teeth - uniform_filter1d(teeth, size=400)
    knocks = unit(disperse(colour(jolts, TAPE_SPECTRUM), delay=.002463))
    rough = unit(knocks + .5 * noise(TAPE_SPECTRUM, rubbing))
    tug = np.sqrt(even) * buzz + np.sqrt(1 - even) * rough
    ticks = unit(disperse(colour(teeth, RATTLE_SPECTRUM), delay=.001994))
    rattle = unit(ticks + 1.5 * noise(RATTLE_SPECTRUM, rubbing))
    scrape = noise(SCRAPE_SPECTRUM, rubbing)
    scrape += (rate / sheen_teeth_per_s) ** 2 * noise(SHEEN_SPECTRUM, rubbing)
    metal = amp(rattle_db - snag_db) * rattle + amp(scrape_db) * scrape
    fade = np.clip(np.minimum(t - t[0], t[-1] - t) / .0022, 0, 1)
    return (amp(tug_db + .5 - snag_db) * tug + amp(-1) * metal) * fade


# Slider speed, one list a pull: (time [s], speed [teeth/s])
PULL_SPEEDS = [
    [(2.125, 427), (2.15, 442), (2.173, 577), (2.185, 487), (2.226, 430), (2.244, 308), (2.26, 210),
     (2.285, 126)],
    [(3.25, 229), (3.28, 274), (3.31, 420), (3.37, 268), (3.40, 134), (3.44, 156), (3.50, 169), (3.52, 282),
     (3.56, 382), (3.60, 255), (3.65, 116)],
    [(4.5, 178), (4.61, 193), (4.66, 220), (4.685, 208), (4.705, 185), (4.73, 255), (4.76, 295),
     (4.83, 289), (4.86, 275), (4.905, 206), (4.925, 77), (4.96, 61.6)],
    [(7.72, 111), (7.80, 121), (7.86, 147), (7.90, 162), (7.95, 154)],
]
# Strength at the microphone, one list a pull: (time [s], tug [dB], rattle [dB], scrape [dB])
PULL_LEVELS = [
    [(2.125, -13, -24, -18), (2.14, -11.5, -23.5, -28.5), (2.2, -5, -22.5, -25.5),
     (2.25, -11.5, -32, -40.5), (2.29, -28, -48, -56.5)],
    [(3.249, -3.5, -14, -27.5), (3.31, -1, -12.5, -24.5), (3.36, -5.5, -15.5, -31.5),
     (3.46, -5.5, -14, -30.5), (3.53, -6, -15, -30.5), (3.61, -12, -16, -40), (3.635, -24.5, -31, -41.5),
     (3.657, -37, -36, -45)],
    [(4.5, -22, -28, -35), (4.6, -16, -25, -31.5), (4.65, -13.5, -15.5, -29), (4.72, -13, -16.5, -33.5),
     (4.79, -15.5, -17.5, -34.5), (4.884, -16.5, -24, -41), (4.954, -30, -34, -48.5),
     (4.969, -48, -52, -53)],
    [(7.72, -29, -55, -67), (7.747, -21, -29, -35.5), (7.86, -25, -36.5, -40), (7.952, -21.5, -38.5, -40.5)],
]
# Tautness of the cloth, one row a pull: (share of clean buzz in a free run [0-1], tape corner [Hz])
TAUTNESS = [(.9, 940), (.4, 640), (.55, 850), (.12, 550)]


def zipper():
    """Four short pulls right next to the microphone; taut cloth buzzes more cleanly than slack."""
    out = np.zeros(N)
    for speed, levels, (evenness, corner_hz) in zip(PULL_SPEEDS, PULL_LEVELS, TAUTNESS):
        add(out, levels[0][0], pull(speed, levels, evenness, corner_hz))
    return out


def scene():
    """Cloth, hands and zipper close on one microphone, over a very quiet room."""
    rub_level, hiss_level, hollow_hz, share = strokes()
    bed = fleece(rub_level, hiss_level, hollow_hz, share) + handling(rub_level) + room_tone()
    return (bed + zipper() + thumps() + slips() + catches())[None]


def record(dry):
    """The microphone input clips softly at full scale and keeps nothing above its band limit."""
    clipped = dry / (1 + np.abs(dry) ** 8) ** (1 / 8)
    m = next_fast_len(N + 4096)
    in_band = np.fft.rfftfreq(m, 1 / SR) < 15950  # Hz
    return irfft(rfft(clipped, m) * in_band, m)[..., :N]


dry = scene()
out = record(dry)
generate_wav(out)
```